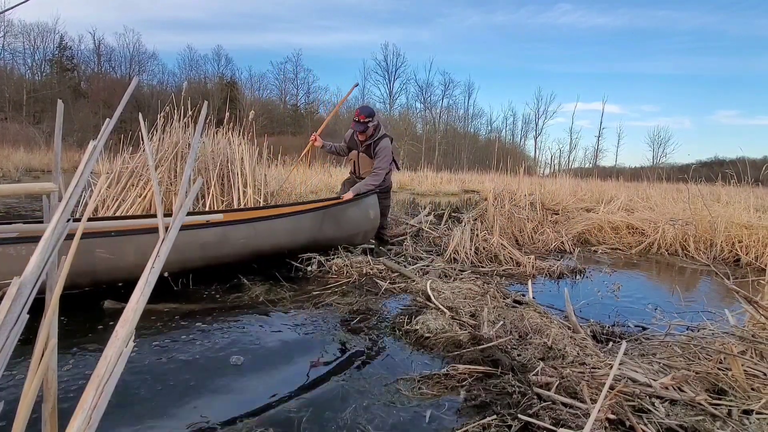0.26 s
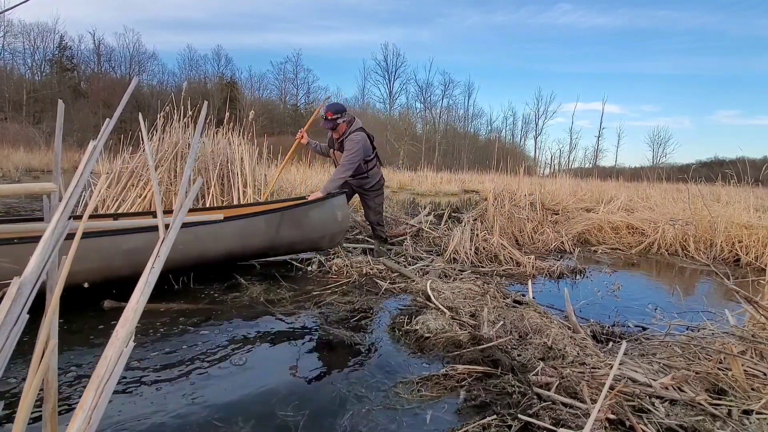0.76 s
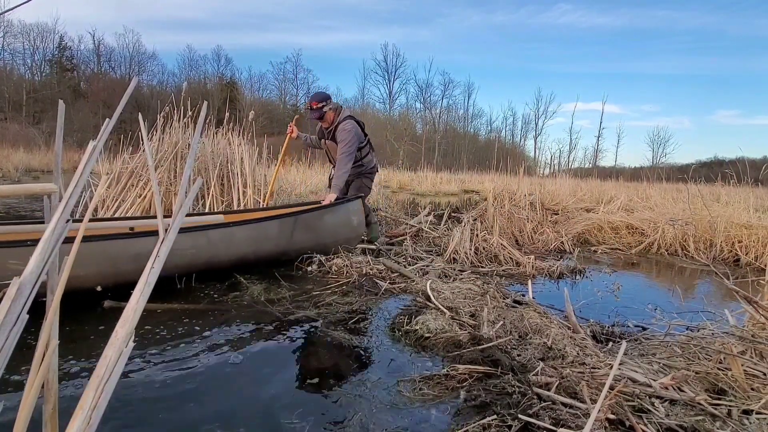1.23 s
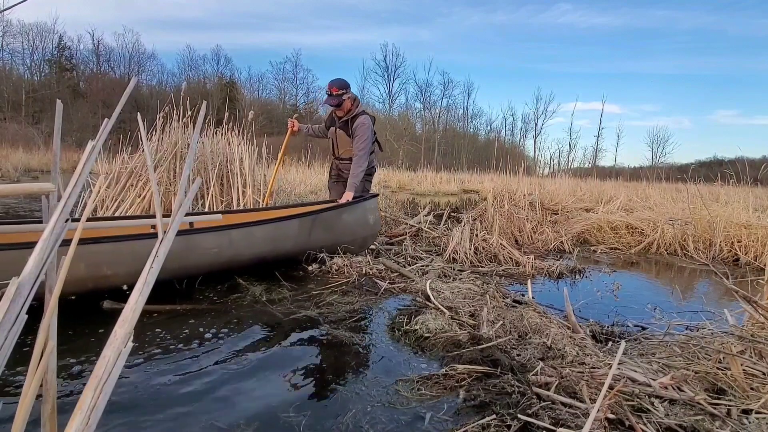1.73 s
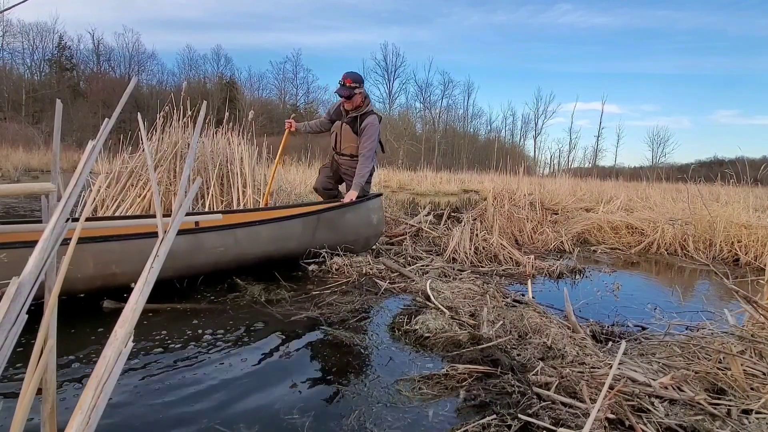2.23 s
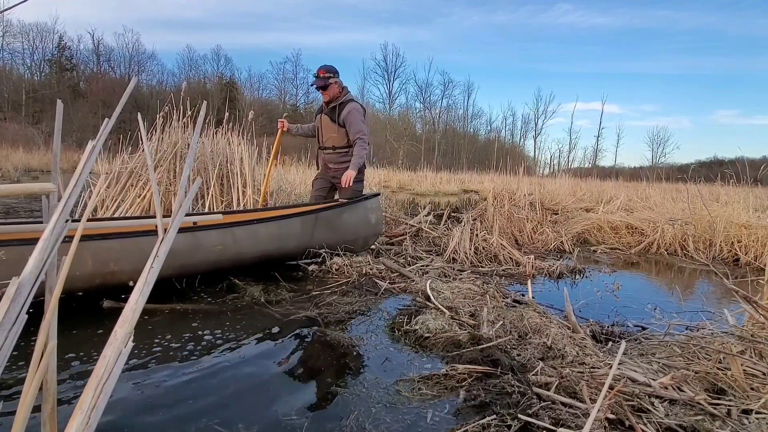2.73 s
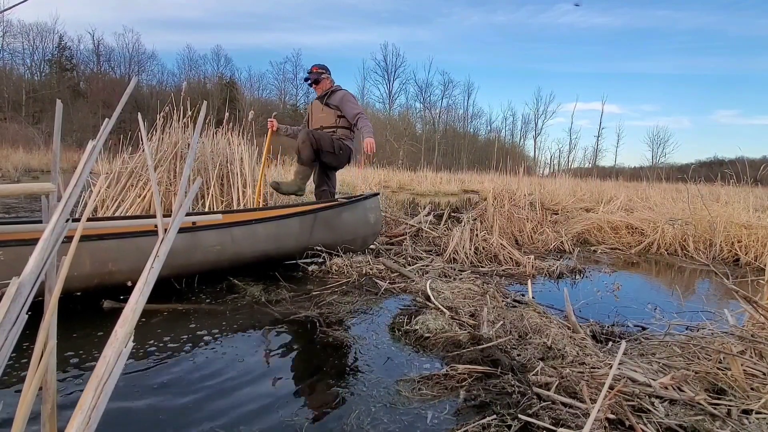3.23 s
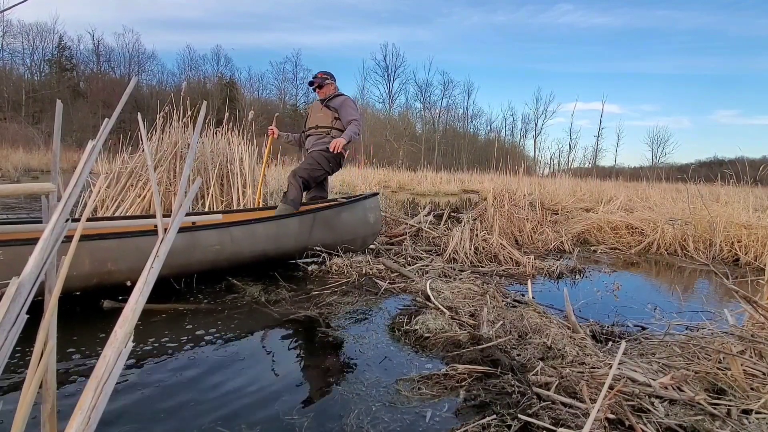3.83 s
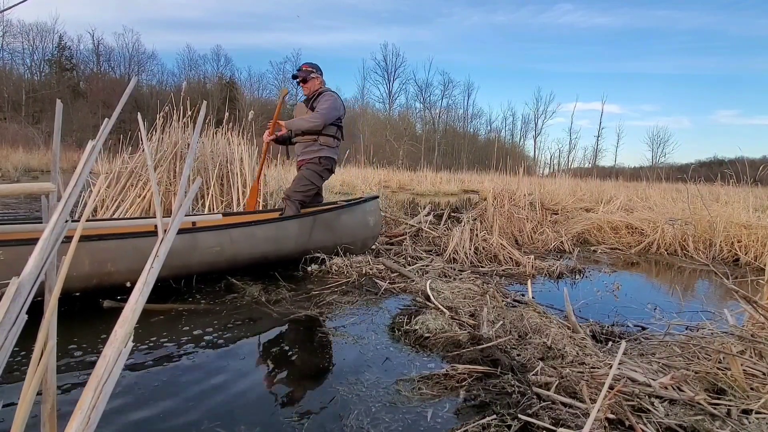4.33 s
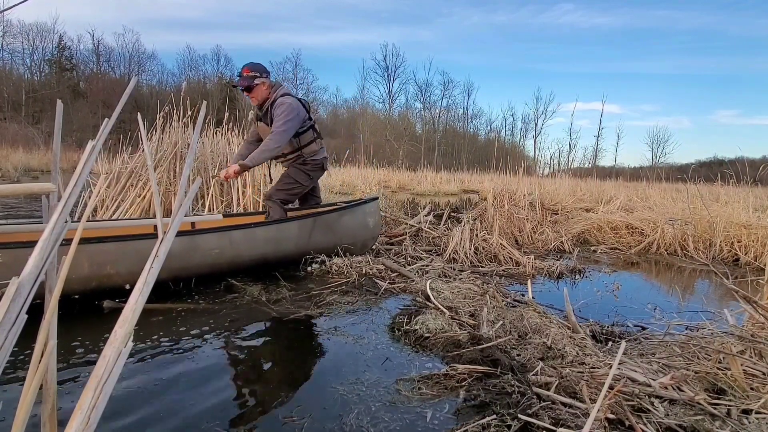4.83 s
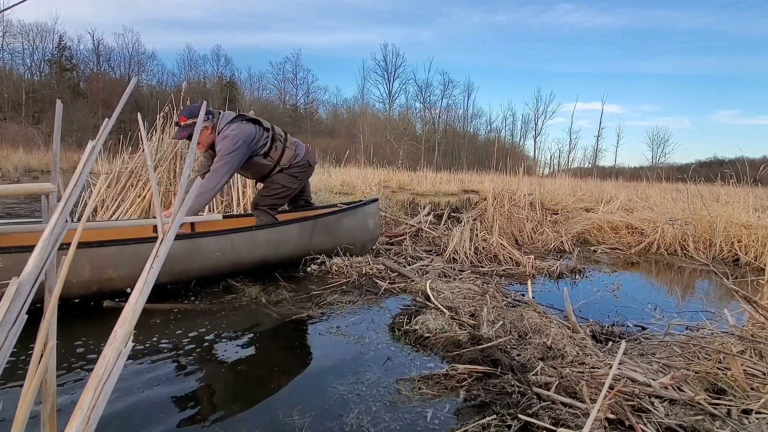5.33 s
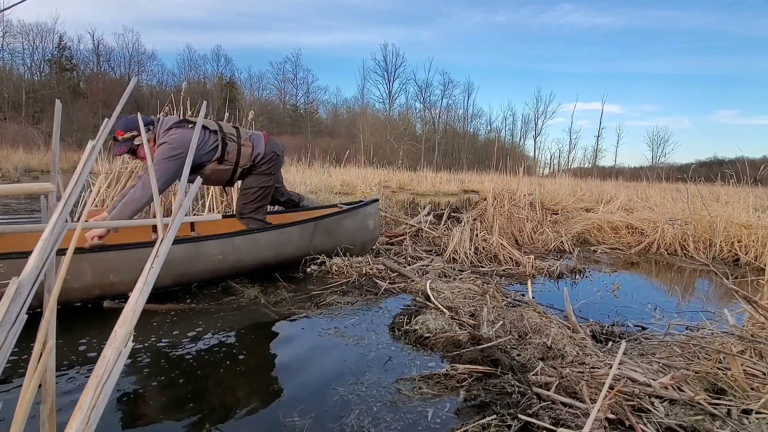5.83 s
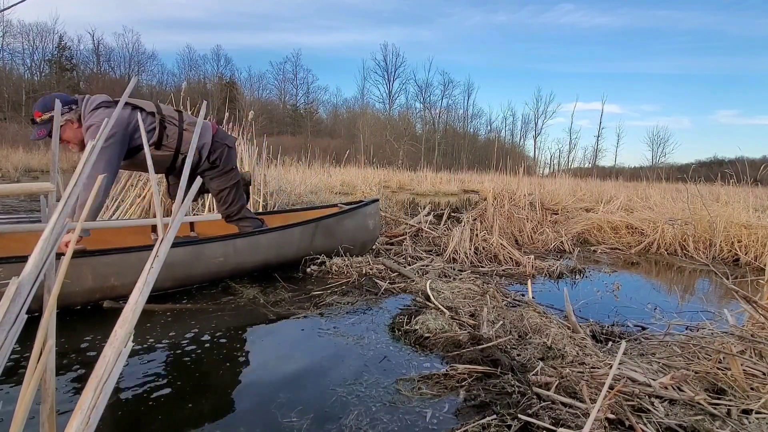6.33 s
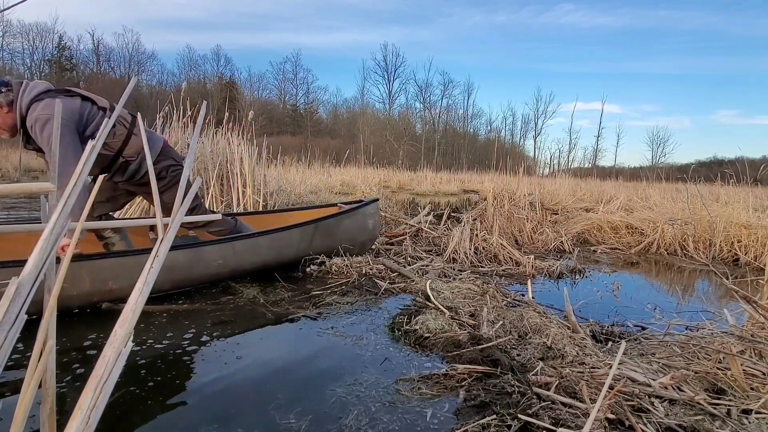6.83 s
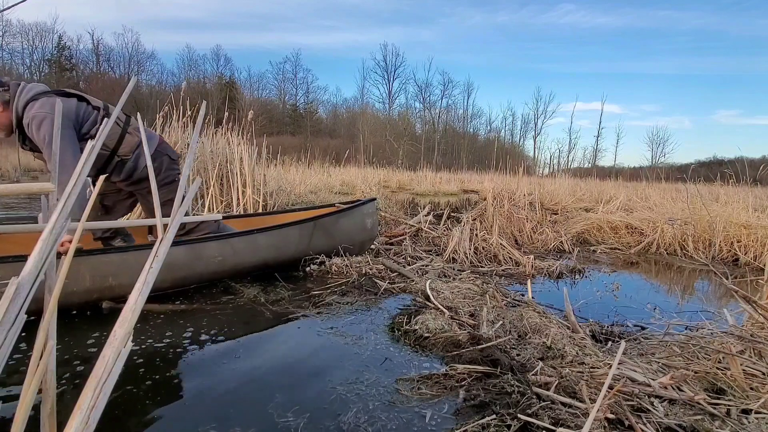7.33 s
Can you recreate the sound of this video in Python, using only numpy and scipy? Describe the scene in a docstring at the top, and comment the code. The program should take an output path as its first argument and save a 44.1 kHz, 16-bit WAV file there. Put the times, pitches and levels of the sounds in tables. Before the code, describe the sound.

Close stereo outdoor sound: a rough, stuttering hull scrape stops with a thud, followed by a small wooden clack, dry twig cracks and soft creaks. Light knocks and a paddle set-down sound in the canoe, then a loud double boom of knees on the hull, ringing low. Faint air, low rumble and distant frogs lie beneath. Thin bird whistles appear early and late, finishing in a fast trill.

```python
"""A canoe is shoved off a bank of dead sticks in a marsh: stick-slip grinds along its hull until it bumps free.
A paddle clacks, twigs snap in bursts under boots, and reeds and clothes rustle at each shift of weight.
Then feet, paddle and knees thump into the hollow hull, whose decaying modes ring on.
A blackbird's gliding tones whistle early and again late, where they lead into a trill of interleaved notes.
Throughout, shaped noise gives the air, a low rumble and far frogs; a diffuse tail answers from the tree line."""
import sys
import numpy as np
from scipy import signal
from scipy.fft import rfft, irfft, next_fast_len
from scipy.io import wavfile
from scipy.ndimage import uniform_filter1d, map_coordinates

SR = 44100
rng = np.random.default_rng(int(sys.argv[2]) if len(sys.argv) > 2 else 0)


def materialize(psi):
    """Save the field psi as 16-bit PCM at rate SR to the path in sys.argv[1].

    A 1-D psi becomes a single channel; in a 2-D psi each row is a channel.
    """
    bounded = np.clip(np.atleast_2d(psi).T, -1, 1)
    quanta = np.round(bounded * 32767).astype(np.int16)
    wavfile.write(sys.argv[1], SR, quanta)


N = 333837
T = np.arange(N) / SR
HIT = T[:SR]  # the one-second time axis of a single blow


def amp(db):
    """Level law: decibels to amplitude gain."""
    return 10 ** (np.asarray(db) / 20)


def unit(x):
    """Normalization to an rms of 1."""
    return x / np.sqrt(np.mean(x ** 2) + 1e-20)


def along(points, hz):
    """Logarithmic pitch scale: read (Hz, value) points along it."""
    f, v = np.transpose(points)
    return np.interp(np.log(hz + 1), np.log(f + 1), v)


def curve(rows):
    """Linear interpolation: one value per sample from (s, value) points."""
    return np.interp(T, *np.transpose(rows))


def fade(t, t60):
    """Exponential decay: 60 dB down after t60 seconds."""
    return np.exp(-np.log(1000) * t / t60)


def swell(length):
    """Half-sine envelope under a square root: a rounded rise and fall."""
    return np.abs(np.sin(np.linspace(0, np.pi, int(length * SR)))) ** .5


def envelope(s, rise, hold, t60):
    """Attack, hold and release: full level is reached at time s."""
    return np.clip((T - s) / rise + 1, 0, 1) * fade(np.maximum(T - s - hold, 0), t60)


def wobble(rate):
    """Slow random modulation: a smooth curve through rate random knots a second."""
    knots = rng.standard_normal(int(N * rate / SR) + 4)
    return map_coordinates(knots, [T * rate])


def add(track, s, sound):
    """Superposition: mix a sound in at time s."""
    part = track[..., max(round(s * SR), 0):][..., :sound.shape[-1]]
    part += sound[..., :part.shape[-1]]


def filtered(x, response):
    """Linear filtering: multiply the spectrum by a response of frequency."""
    m = next_fast_len(x.shape[-1] + SR // 4)
    return irfft(rfft(x, m) * response(np.fft.rfftfreq(m, 1 / SR)), m)[..., :x.shape[-1]]


def coloured(x, spectrum):
    """Spectral shaping: x weighted by (Hz, dB) points, at rms 1."""
    return unit(filtered(x, lambda f: amp(along(spectrum, f))))


def resonance(f, hz, width):
    """Damped oscillator: the causal response of one mode."""
    return 1j * f * width / (hz * hz - f * f + 1j * f * width)


def through(x, modes):
    """Modal summation: x through (Hz, width Hz, dB) resonances of alternating sign, at rms 1."""
    def response(f):
        return sum((-1) ** k * amp(db) * resonance(f, hz, w) for k, (hz, w, db) in enumerate(modes))
    return unit(filtered(x, response))


# coherence of diffuse sound between left and right: pitch_hz, likeness (0 to 1)
ALIKE = [(130, 0.95), (300, 0.85), (640, 0.71), (1400, 0.0756), (3100, 0.0124)]


def noise(size=N, alike=ALIKE):
    """Interaural coherence: stereo noise, alike in the bass and nearly unrelated in the treble."""
    def mid_and_side(f):
        turn = np.arccos(np.clip(along(alike, f), -1, 1)) / 2
        return np.array([np.cos(turn), np.sin(turn)])
    mid, side = filtered(rng.standard_normal((2, size)), mid_and_side)
    return np.array([mid + side, mid - side])


def grains(rate, spread_db, life, bed, alike=ALIKE):
    """Shot noise: tiny bursts of random size at random times, on a bed of smooth noise."""
    sizes = (rng.random(N) < rate / SR) * amp(spread_db * np.minimum(rng.exponential(size=N), 3))
    bursts = signal.fftconvolve(sizes, fade(HIT, life))[:N]
    return noise(alike=alike) * (unit(bursts) + bed)


def dying(lives):
    """Frequency-dependent damping: a second of stereo noise, each pitch with its own t60."""
    hz, t, z = signal.stft(noise(size=SR), SR, nperseg=256)
    decayed = z * fade(t, along(lives, hz)[:, None])
    return signal.istft(decayed, SR, nperseg=256)[1][:, :SR]


def band(hz, width):
    """Band-pass filtering: stereo noise in a steep-sided band, at rms 1."""
    return unit(filtered(noise(), lambda f: 1 / (1 + (2 * (f - hz) / width) ** 4)))


def glide(length, start_hz, end_hz):
    """Frequency modulation: phase of a linearly sliding pitch, and a swell of the same length."""
    pitch = np.linspace(start_hz, end_hz, int(length * SR))
    return 2 * np.pi * np.cumsum(pitch) / SR, swell(length)


def gliding_noise(length, start_hz, end_hz, width_hz):
    """Narrow-band noise: a rounded burst that wavers unsteadily around one gliding pitch."""
    phase, shape = glide(length, start_hz, end_hz)
    unsteady = filtered(rng.standard_normal((2, SR)), lambda f: 1 / (1 + (2.14 * f / width_hz) ** 4))
    a, b = unsteady[:, :len(phase)]
    return unit(shape * (a * np.cos(phase) + b * np.sin(phase)))


def patchy(x, depth_db):
    """Local fluctuation: the level drifts independently in small patches of pitch and time."""
    z = signal.stft(x, nperseg=1024)[2]
    field = rng.standard_normal(z.shape[1:])
    field = uniform_filter1d(uniform_filter1d(field, size=4, axis=0), size=5, axis=1)
    return unit(signal.istft(z * amp(depth_db * unit(field)), nperseg=1024)[1][:, :N])


def drifting(x, share, rate):
    """Time warping: all resonances of a texture wander up and down together."""
    position = np.cumsum(1 + share * wobble(rate))
    return np.array([map_coordinates(port, [position], mode="mirror") for port in x])


SLIDE_T60_S = 0.082  # the scrape dies once the hull floats free
# how hard the hull bears on the sticks as it slides: time_s, level_db
LOAD = [(0, -26), (0.07, -33.5), (0.18, -32.5), (0.265, -34.5), (0.34, -30.5), (0.465, -29), (0.581, -39.5),
        (0.69, -41), (0.786, -46.5)]


def load(grows):
    """Friction law: gain follows the load on the sliding hull by so many dB per dB."""
    times, db = np.transpose(LOAD)
    usual_db = db.mean()
    gain = amp(usual_db + grows * (np.interp(T, times, db) - usual_db))
    return gain * fade(np.maximum(T - times[-1], 0), SLIDE_T60_S)


# level at the usual load [dB], and growth [dB per dB of load], of the panels and of the skin
BOOM_DB, BOOM_GROWS = 0, 0.95
RASP_DB, RASP_GROWS = 2, 0.89
THINNING_DB_PER_S, THINNING_HZ = 9, 533  # as the water takes the weight, the rasp loses its low end
RASP_PATCHY_DB = 3  # the contact points shift, so the colour keeps changing
RASP_DRIFT, RASP_DRIFT_RATE = .035, 13  # resonances wander: share of pitch, turns a second
# coherence of sounds from the hull's skin: pitch_hz, likeness (0 to 1)
SLIDE_ALIKE = [(200, 1), (1400, 0.77), (5000, 0.075)]
# panels that the sliding shakes: pitch_hz, width_hz, relative_level_db
PANELS = [(83.6, 19, -4), (111.4, 23.5, -1), (162, 35, -6), (216, 75, -9.5)]
# resonances of the rasping skin: pitch_hz, width_hz, relative_level_db
RASP = [(306, 52, 2), (400, 69, -1.5), (475, 52, 3.5), (625, 400, -3), (930, 150, 0.5), (1170, 540, -8.5),
        (1550, 130, -5), (1720, 105, -5), (2100, 210, -5.5)]
# spectrum of fine grit: pitch_hz, relative_level_db
GRIT = [(1500, -1.5), (2500, 0.5), (3800, -1.5), (5000, -10), (7000, -14), (10000, -22), (15000, -19.5)]
# gritty treble of the scrape: time_s, level_db
GRIT_LEVEL = [(0, -35.5), (0.12, -42), (0.225, -43.5), (0.345, -37.5), (0.39, -41.5), (0.462, -40),
              (0.5, -42), (0.77, -51.5)]


def slide():
    """Stick-slip friction: the panels boom, the skin rasps and grit hisses."""
    surges = amp(1.5 * wobble(35))
    slips = surges * grains(rate=900, spread_db=3, life=.006, bed=.7, alike=SLIDE_ALIKE)
    boom = unit(filtered(through(slips, PANELS), lambda f: 1 - 1 / (1 + (f / 68) ** 6)))

    def rippled(f):
        # the skin's many narrow modes ripple the spectrum
        ripple = amp(3.65 * unit(uniform_filter1d(rng.standard_normal(len(f)), 300)))
        return ripple / (1 + (f / 2600) ** 8)
    rasp = filtered(through(slips, RASP), rippled)
    rasp = patchy(drifting(rasp, RASP_DRIFT, RASP_DRIFT_RATE), RASP_PATCHY_DB)
    low_end = filtered(rasp, lambda f: 1 / (1 + (f / THINNING_HZ) ** 6))
    rasp = rasp - (1 - amp(-THINNING_DB_PER_S * T)) * low_end
    # fine grit merges into a continuous hiss, with the coarser slips ticking through it
    grit = patchy(coloured(noise(alike=SLIDE_ALIKE) + unit(slips), GRIT), RASP_PATCHY_DB)
    grit_gain = amp(curve(GRIT_LEVEL)) * fade(np.maximum(T - GRIT_LEVEL[-1][0], 0), SLIDE_T60_S)
    boom_gain = amp(BOOM_DB) * load(BOOM_GROWS)
    rasp_gain = amp(RASP_DB) * load(RASP_GROWS)
    return boom_gain * boom + rasp_gain * rasp + grit_gain * grit


# slips a second, scatter of their rate (natural log), t60 of one slip [s]
CHATTER_HZ, CHATTER_SCATTER, CHATTER_T60_S = 125, 0.36, 0.029
# sticks that dig into the sliding hull: start_s, length_s, level_db
BITES = [(0.0, 0.018, -36.5), (0.134, 0.044, -36.5), (0.325, 0.04, -28.5), (0.429, 0.05, -32.5)]
# spectrum of the chatter: pitch_hz, relative_level_db
BITE_TONE = [(100, -15), (300, 8.5), (1800, -5.5), (2800, -4), (3900, -12.5), (15000, -44)]


def bites():
    """Relaxation oscillation: a stick digs in and chatters in a quick run of uneven slips."""
    turns = np.cumsum(CHATTER_HZ * np.exp(CHATTER_SCATTER * wobble(90))) / SR
    starts = np.diff(np.floor(turns), prepend=0)
    slips = signal.fftconvolve(starts, fade(HIT, CHATTER_T60_S))[:N]
    grip = np.zeros(N)
    for s, length, db in BITES:
        add(grip, s, amp(db) * swell(length))
    return grip * coloured(noise(alike=SLIDE_ALIKE) * slips, BITE_TONE)


JUDDER_SAG, JUDDER_WIDTH = 0.0524, 0.17  # shares of the pitch
# surfaces that catch and judder against the hull: start_s, length_s, pitch_hz, level_db
JUDDERS = [(0.005, 0.24, 411, -35), (.075, 0.16, 125, -35.5), (0.163, 0.028, 1055, -35.5),
           (0.298, 0.11, 965, -32), (0.328, 0.085, 119.5, -29.5), (0.389, 0.094, 690, -34.5),
           (.37, 0.24, 1790, -38.5)]


def judders():
    """Self-excited friction: a caught stick or boot judders near a pitch that sags as it lets go."""
    out = np.zeros(N)
    for s, length, hz, db in JUDDERS:
        judder = gliding_noise(length, hz, hz * (1 - JUDDER_SAG), JUDDER_WIDTH * hz)
        add(out, s, amp(db) * judder)
    return out


def modes_ringing(modes):
    """Modal decay: a second of (Hz, dB, t60 s) modes, a little different in level at each blow."""
    return sum(amp(db + rng.normal(0, 1)) * fade(HIT, t60) * np.sin(2 * np.pi * hz * HIT)
               for hz, db, t60 in modes)


MAIN_MODE_HZ = 190
# lowest pitch a spot yields to: its value at the main mode, and how it climbs with the spot's pitch
YIELD_HZ, YIELD_POWER = 121, 0.81
BRAKE_S, BRAKE_POWER = 0.033, 0.51  # the first swings' extra level at the main mode; shorter if stiffer
# hull modes: pitch_hz, relative_level_db, t60_s
HULL = [(80.1, 2.5, 0.75), (107.7, -1.5, 0.52), (122.4, -1.5, 0.46), (160, 0, 0.32), (191, 3, 0.11),
        (221.9, -4.5, 0.39), (276.1, -4, 0.42), (348, -7, 0.053), (463, -9.5, 0.25), (508, -11, 0.059),
        (628, -7, 0.1), (871, -3, 0.0415), (1124, 0, 0.044), (1334, -8.5, 0.055)]
# crowded higher modes of the skin: pitch_hz, relative_level_db
SKIN = [(45, -54), (110, -11), (200, -1.5), (350, -3), (550, -8), (900, -5.5), (1300, -5.5), (2200, -12.5),
        (3500, -10), (5500, -6.5), (8000, -6.5), (15000, 2.5)]
# their decay: pitch_hz, t60_s
SKIN_LIFE = [(150, 0.39), (500, 0.21), (1200, 0.098), (4000, 0.12), (14000, 0.028)]


def hull_blow(spot_hz, soft_hz):
    """Impact excitation: the struck spot and the softness of the contact choose the hull's modes."""
    # the first wavefront leaves the contact point as one sharp pulse
    pulse = (np.arange(SR) == SR // 1000).astype(float)
    front = amp(-1) * coloured(pulse, SKIN)
    skin = amp(7.0) * coloured(dying(SKIN_LIFE), SKIN)
    scuff = amp(9.0) * coloured(noise(size=SR) * fade(HIT, 0.011), SKIN)
    # the foot or knee settles on the hull and damps its first swings
    stiffness = spot_hz / MAIN_MODE_HZ
    damping = 1 + amp(-6) / (1 + (HIT / BRAKE_S * stiffness ** BRAKE_POWER) ** 8)
    low_hz = YIELD_HZ * stiffness ** YIELD_POWER

    def contact(f):
        # stiff spots give little bass, soft contacts little treble
        stiff = resonance(f, low_hz, low_hz) * 1j * f / low_hz * 1j * f / (1j * f + .5 * low_hz)
        soft = 1 / (1 - (f / soft_hz) ** 2 + 1.4j * f / soft_hz)
        spot = 1 + 1.13 * resonance(f, spot_hz, 0.29 * spot_hz)
        return stiff * soft * spot
    ringing = (unit(modes_ringing(HULL)) + skin) * damping
    blow = filtered(ringing + scuff + front, contact)
    return blow / np.std(blow[:, :SR // 50])


RISE_CYCLES = 0.68  # each mode builds up with this time constant, in its own swings
CHOKE_S, CHOKE_LEFT = 0.036, 0.166  # when the weight chokes the ring, and the share that outlasts it
CRACK_DB, CRACK_HZ, CRACK_T60_S = -8.5, 5260, .08  # the bright crack of a heavy blow
# modes of the parts that take the heavy blows: pitch_hz, relative_level_db, t60_s
KEEL = [(156, -11, 0.14), (534, 2.5, 0.031), (690, -6, 0.034)]
RIM = [(735, 0.15, 0.012), (1360, -1.16, 0.0059)]
FLOOR_AFT = [(111, 5.5, 0.28), (305, -17, 0.13), (530, -15, 0.11)]
THWART = [(82.5, -17.5, 0.424), (105, -16, 0.54), (216, 4.5, .16), (290.7, -5.5, 0.42), (332, -2.5, 0.28),
          (513.4, -14, 0.4), (1200, -12, 0.046), (1355, -5, 0.042)]
FLOOR_MID = [(85.6, -20, .6), (192, -2.5, 0.3), (355, 0, 0.061), (548, -14.5, 0.13), (613, -12, 0.1),
             (1160, -15.5, 0.069)]
FLOOR_FORE = [(122, -2, 0.49), (220, 1, 0.17), (290.6, 2.5, 0.14), (368, -4.5, 0.1), (527, -5, 0.12)]
# heavy blows: start_s, part_level_db, hull_level_db, favoured_hz, softness_cutoff_hz, part
SLAMS = [(0.73, -21, -24.5, 537, 826, KEEL), (3.1065, -29.5, -28.5, 890, 2090, RIM),
         (4.321, -25, -30.5, 200, 530, FLOOR_AFT), (5.472, -14, -20, 111.7, 1050, THWART),
         (5.569, -11.5, -15, 166, 1114, FLOOR_MID), (7.007, -30.5, -28.5, 137, 600, FLOOR_FORE)]


def slams():
    """Loaded resonance: a struck part booms until the weight chokes it, and the hull rings on."""
    out = np.zeros((2, N))
    for s, db, hull_db, spot_hz, soft_hz, part in SLAMS:
        ring = sum(modes_ringing([mode]) * (1 - np.exp(-HIT * mode[0] / RISE_CYCLES)) for mode in part)
        ring = ring * (CHOKE_LEFT + (1 - CHOKE_LEFT) / (1 + (HIT / CHOKE_S) ** 8))
        ring = filtered(ring, lambda f: (1j * f / (1j * f + 45)) ** 2)
        boom = amp(db) * ring / np.std(ring[:SR // 50])
        # the crack grows with the square of the force, so it stands out only in the hardest blows
        bright = filtered(noise(size=SR), lambda f: resonance(f, CRACK_HZ, CRACK_HZ / 2))
        crack = amp(2 * db + CRACK_DB) * bright * fade(HIT, CRACK_T60_S)
        add(out, s, boom + crack + amp(hull_db) * hull_blow(spot_hz, soft_hz))
    return out


# light blows on the hull: start_s, level_db, favoured_hz, softness_cutoff_hz
KNOCKS = [(0.744, -28, 160, 202), (1.111, -49, 400, 596), (1.702, -33, 666, 1250), (1.72, -31, 165, 690),
          (1.786, -37.5, 480, 1510), (3.058, -33.5, 149, 1200), (3.089, -33.5, 1720, 3000),
          (3.097, -32, 1400, 2400), (3.144, -38.5, 1850, 3250), (3.156, -39.5, 680, 1320),
          (3.782, -51, 360, 513), (4.391, -30, 109, 149), (4.446, -40.5, 323, 990),
          (4.474, -37.5, 98.4, 149.5), (5.484, -24.5, 260, 800), (5.519, -19, 258, 765),
          (5.790, -37.5, 129, 300), (7.043, -33.5, 109, 220), (7.131, -36, 111, 298)]


def knocks():
    """Shared modes: light blows all ring the same hull."""
    out = np.zeros((2, N))
    for s, db, spot_hz, soft_hz in KNOCKS:
        add(out, s, amp(db) * hull_blow(spot_hz, soft_hz))
    return out


TAP_WIDTH, TAP_CLICK_DB = 0.38, -28  # ring width as a share of its pitch; broad click beside it
# short dry taps of sticks, boots and the paddle shaft on the skin: start_s, level_db, pitch_hz, t60_s
TAPS = [(0.068, -30, 1450, .04), (0.467, -28, 800, 0.063), (1.166, -45, 970, 0.077),
        (1.201, -45, 1380, 0.062), (1.259, -51, 1874, .08), (5.39, -52, 1380, 0.02),
        (5.479, -29, 1596, .05), (6.911, -49.5, 1090, 0.0077), (6.998, -39.5, 1200, 0.053),
        (7.028, -37, 1200, 0.0058)]


def taps():
    """Local resonance: a hard, light contact clicks and briefly rings one small patch of skin."""
    out = np.zeros((2, N))
    t = HIT[:SR // 8]
    click = amp(TAP_CLICK_DB)
    for s, db, ring_hz, t60 in TAPS:
        def patch(f):
            return (resonance(f, ring_hz, TAP_WIDTH * ring_hz) + click) / (1 + .5j * f / ring_hz)
        contact = noise(size=len(t), alike=SLIDE_ALIKE) * fade(t, t60)
        tap = filtered(contact, patch)
        add(out, s, amp(db) * tap / np.std(tap[:, :SR // 200]))
    return out


CLACK_S = 0.918
# modes of the wooden paddle: pitch_hz, relative_level_db, t60_s
PADDLE = [(1300, -0.5, 0.13), (1700, 8.5, 0.053), (2475, 14.5, 0.046), (3230, 6, 0.078), (3950, -4, 0.073)]


def clack():
    """Free bar modes: the wooden paddle is tapped once, a short dry tock."""
    out = np.zeros((2, N))
    ring = sum(amp(db) * fade(HIT, t60) * np.sin(2 * np.pi * hz * HIT) for hz, db, t60 in PADDLE)
    contact = coloured(noise(size=SR) * fade(HIT, 0.051), GRIT)
    tock = (unit(ring) + .5 * contact) * (1 - np.exp(-HIT / 0.00099))
    add(out, CLACK_S, amp(-37) * tock / np.std(tock[:, :SR // 100]))
    return out


# snapping twigs: start_s, level_db, t60_s, pitch_hz
SNAPS = [(1.67, -41.5, 0.035, 1500), (1.719, -41.5, 0.13, 3980), (1.785, -17.5, 0.033, 3860),
         (1.923, -42.5, 0.041, 4640), (2.099, -45, 0.056, 6540), (2.111, -39, .03, 11000),
         (2.122, -35.5, 0.05, 7100), (2.239, -44, 0.16, 4360), (2.268, -40, 0.042, 7040),
         (2.314, -45, 0.088, 2060), (2.357, -47, 0.038, 4660), (2.708, -47, 0.24, 7340),
         (2.996, -24, 0.051, 2200), (3.057, -25, 0.18, 2920), (3.323, -51, 0.013, 12800),
         (4.45, -47, 0.056, 5970), (6.245, -56, 0.028, 9900)]
# spectrum of a snap: pitch_hz, relative_level_db
TWIG = [(100, 3), (400, -4), (900, 3), (1600, -6.5), (3000, -4), (5500, 0.5), (8000, -6.5), (12000, -2.5),
        (15000, -4.5)]


def snaps():
    """Brittle fracture: fibres break in a ragged burst, ring briefly and scatter off the pile."""
    out = np.zeros((2, N))
    t = HIT[:SR // 3]
    for s, db, t60, ring_hz in SNAPS:
        fibres = amp(unit(uniform_filter1d(rng.standard_normal(len(t)), 40)))
        direct = rng.standard_normal(len(t)) * fibres * fade(t, t60)
        scatter = noise(size=len(t)) * (9.8 * fade(t, t60) + amp(-8.5) * fade(t, 0.32))
        burst = (direct + scatter) * (1 - np.exp(-t / 0.00027))

        def wood(f):
            return amp(along(TWIG, f)) * (1 + 1.85 * resonance(f, ring_hz, 0.18 * ring_hz))
        crack = filtered(burst, wood)
        add(out, s, amp(db) * crack / np.std(crack[:, :SR // 200]))
    return out


SWISH_WIDTH = 0.47  # share of the starting pitch
# one low swish, then two short high chip-like squeaks, perhaps a bird's:
# start_s, length_s, start_hz, end_hz, level_db
SWISHES = [(1.139, 0.19, 700, 899, -57), (5.047, 0.034, 6220, 6600, -45), (5.092, 0.038, 2855, 2750, -55.5)]


def swishes_and_squeaks():
    """Band-limited noise: one low swish and two short, high, chip-like squeaks."""
    out = np.zeros((2, N))
    for s, length, start_hz, end_hz, db in SWISHES:
        add(out, s, amp(db) * gliding_noise(length, start_hz, end_hz, SWISH_WIDTH * start_hz))
    return out


MOVE_RISE_S = .12  # each shift swells this long before it is at full level
# shifts of weight, on the stick pile and then in the hull:
# full_level_s, hold_s, t60_s, creak_level_db, rustle_level_db
MOVES = [(0.762, 0.22, 2.4, -52, -56), (1.193, 0.69, 3.7, -50, -55), (1.668, 0.17, 1.8, -43, -48.5),
         (2.195, 0.097, 1.16, -52, -54.5), (3.057, 0.02, 1.32, -53, -45), (4.436, 0.06, 0.76, -51, -57),
         (5.112, 0.025, 3, -78, -59), (5.65, 0.17, 3.9, -58, -53), (6.967, 0.1, 1.56, -45.5, -57.5),
         (7.345, 0.11, 0.45, -45.5, -61.5)]
# spectrum of the creaks: pitch_hz, relative_level_db
CREAK_TONE = [(45, -17), (85, 5.5), (125, -6.5), (165, 2.5), (250, -7), (420, -6.5), (650, -14),
              (1200, -21), (2500, -32), (5000, -52)]
# spectrum of the rustle: pitch_hz, relative_level_db
REEDS = [(700, 7.5), (1500, 2.5), (5500, 1.5), (8000, -3), (14500, -3)]


def shuffling():
    """Granular friction: shifts of weight give dull creaks and a fine rustle of reeds and clothes."""
    creaks = coloured(grains(rate=68, spread_db=3.5, life=0.032, bed=1.0), CREAK_TONE)
    rustle = coloured(grains(rate=150, spread_db=-1.0, life=0.0094, bed=3.5), REEDS)
    creak_gain, rustle_gain = np.zeros((2, N))
    for full_s, hold, t60, creak_db, rustle_db in MOVES:
        move = envelope(full_s, MOVE_RISE_S, hold, t60)
        creak_gain = np.maximum(creak_gain, amp(creak_db) * move)
        rustle_gain = np.maximum(rustle_gain, amp(rustle_db) * move)
    return creak_gain * creaks + rustle_gain * rustle


WHISTLE_ROUGH_S = 0.0067  # notes this short are rough; longer ones are purer
WHISTLE_FADE_DB = 9  # each note sinks this much along its length
WHISTLE_WAVER_DB, WHISTLE_WAVER_HZ = 3, 22  # scale of a note's unsteadiness in level and pitch
# blackbird whistles: start_s, length_s, start_hz, end_hz, level_db
WHISTLES = [(2.273, 0.037, 4640, 4600, -68), (2.343, 0.042, 4500, 4480, -64),
            (2.422, 0.17, 4380, 4410, -58.5), (6.375, 0.068, 4584, 4600, -67.5),
            (6.381, 0.052, 1404, 1470, -64), (6.463, 0.09, 4360, 4410, -61.5),
            (6.548, 0.087, 4370, 4370, -67), (6.61, 0.093, 2440, 2440, -67.5),
            (6.788, 0.0093, 2070, 2300, -53), (6.799, 0.029, 2430, 2290, -59),
            (6.823, 0.01, 2230, 2327, -50), (6.827, 0.063, 1970, 2040, -59.5),
            (6.835, 0.037, 1700, 1720, -62.5)]


def whistles():
    """Frequency-modulated tones: thin whistles and a broken chirp, rougher the shorter they are."""
    song = np.zeros((2, N))
    for s, length, start_hz, end_hz, db in WHISTLES:
        phase, shape = glide(length, start_hz, end_hz)
        size = len(phase)
        sink = amp(WHISTLE_FADE_DB * np.linspace(.5, -.5, size))
        waver = amp(WHISTLE_WAVER_DB * wobble(35)[:size])
        bend = 2 * np.pi * np.cumsum(WHISTLE_WAVER_HZ * wobble(51)[:size]) / SR
        rough = np.sqrt(WHISTLE_ROUGH_S / length) * wobble(260)[:size]
        add(song, s, amp(db) * shape * sink * waver * np.sin(phase + bend + rough))
    return song


# full level from, swell, hold, release t60 [s]; level [dB]
TRILL_S, TRILL_RISE_S, TRILL_HOLD_S, TRILL_T60_S, TRILL_DB = 6.97, 0.11, 0.505, 0.14, -58
TRILL_RATE, TRILL_RUSH, TRILL_SETTLE_S = 51, 14, 0.132  # notes/s; starts this much faster, then settles
TRILL_JITTER, TRILL_BLUR = .025, 0.65  # unevenness of the pace; scattered over direct sound
TRILL_FLICK = .3  # sweep: the pitch swings by this over pi, in widths, either way
# interleaved notes of the trill: pitch_hz, width_hz, relative_level_db
TRILL_NOTES = [(2850, 670, -2), (3600, 436, -8), (2560, 300, -11)]


def trill():
    """Amplitude and frequency modulation: interleaved pulsing notes fuse into a buzz."""
    song = np.zeros((2, N))
    rush = TRILL_RUSH * np.exp(-np.maximum(T - TRILL_S, 0) / TRILL_SETTLE_S)
    rate = (TRILL_RATE + rush) * (1 + TRILL_JITTER * wobble(25))
    cycle = 2 * np.pi * np.cumsum(rate) / SR
    gain = amp(TRILL_DB) * envelope(TRILL_S, TRILL_RISE_S, TRILL_HOLD_S, TRILL_T60_S)
    for k, (hz, width, db) in enumerate(TRILL_NOTES):
        # each pulse is a rough little flick; the reeds scatter part of it into a blur
        beat = cycle + k * np.pi / 2
        pitch = hz + width * (TRILL_FLICK * np.sin(beat) / np.pi + wobble(400) / 7)
        pulses = (1 + np.cos(beat)) ** 2 * amp(1.3 * wobble(45))
        flick = np.sin(2 * np.pi * np.cumsum(pitch) / SR) * pulses
        song += amp(db) * gain * (unit(flick) + TRILL_BLUR * band(hz, width))
    return song


# diffuse decay off the bank and trees: pitch_hz, t60_s
TREES = [(80, 0.934), (300, 2.03), (6000, 2.9), (14000, 4.9)]


def echo(x):
    """Diffuse reverberation: the bank and the tree line scatter back a faint long tail."""
    tail = dying(TREES) * (1 - np.exp(-HIT / 0.068))
    tail = tail / np.linalg.norm(tail[0])
    return signal.fftconvolve(x.mean(axis=0)[None], tail, axes=1)[:, :N]


# spectrum of the open air: pitch_hz, relative_level_db
AIR = [(20, -26.5), (45, -3), (75, -7), (150, -6), (260, -13.5), (400, -15), (800, -18), (1200, -20),
       (1700, -31), (2300, -30.5), (5300, -27), (14500, -33.5)]
# the far chorus is steady, then sinks: time_s, level_db
FROGS = [(5.2, -76), (7.2, -80)]


def marsh():
    """Band-limited noise: open air, a soft low rumble and the blurred peeping of far frogs."""
    air = amp(-62.0) * coloured(noise(), AIR) * amp(0.32 * wobble(3.9))
    breeze = amp(2.5 * wobble(4))
    rumble = amp(-64.5) * band(hz=67.7, width=49) * breeze
    frogs = amp(curve(FROGS)) * band(hz=2850, width=380) * amp(2.5 * wobble(14))
    return air + rumble + frogs


LEAD_S = 0.000082  # the canoe lies to the left, so its sound reaches that port first


def scene():
    """Superposition of canoe, sticks and bird in the open marsh, with a time lead on the left."""
    scrape = slide() + bites() + judders()
    blows = knocks() + taps() + slams() + clack()
    left_first = scrape + blows + swishes_and_squeaks()
    sides = np.array([[1], [-1]])
    near = filtered(left_first, lambda f: np.exp(1j * np.pi * f * LEAD_S * sides)) + snaps()
    bird = whistles() + trill()
    echoes = amp(-30.0) * echo(near) + amp(-10) * echo(bird)
    return near + bird + echoes + shuffling() + marsh()


TOP_HZ = 14760  # band limit
# left over right level of the microphone ports: pitch_hz, level_difference_db
LEAN = [(200, 0), (600, 0.5), (1300, -1), (2400, -2), (4300, -6.5), (8000, -1), (13000, 6.5)]


def record(dry):
    """Transducer response: two ports colour the sound differently below a steep band limit."""
    def ports(f):
        lean = along(LEAN, f)
        return amp(np.array([lean, -lean]) / 2) / np.sqrt(1 + (f / TOP_HZ) ** 400)
    return filtered(dry, ports)


dry = scene()
out = record(dry)
materialize(out)
```